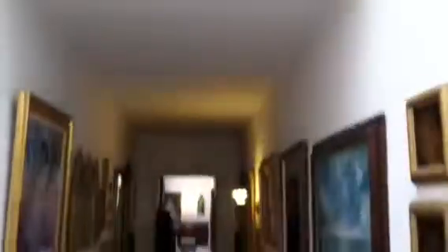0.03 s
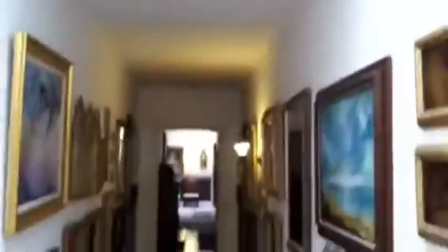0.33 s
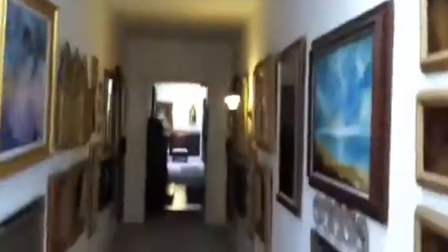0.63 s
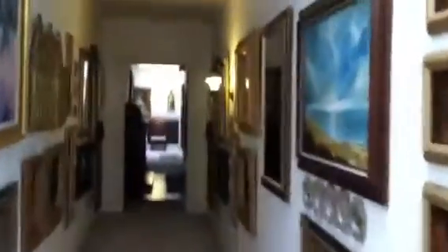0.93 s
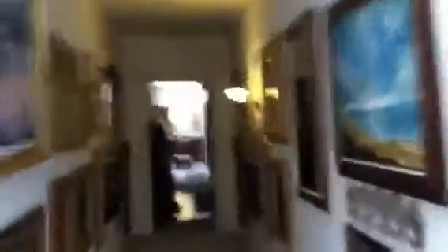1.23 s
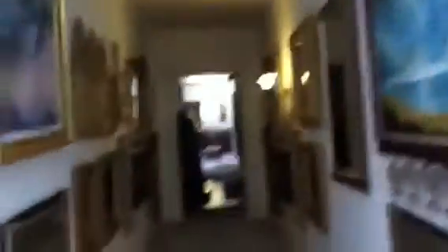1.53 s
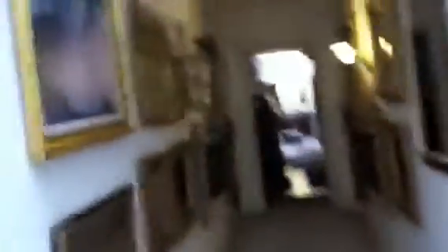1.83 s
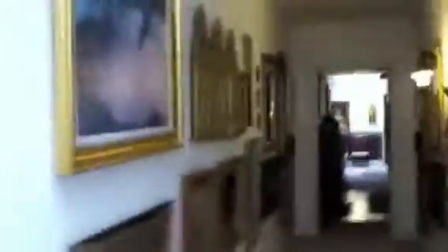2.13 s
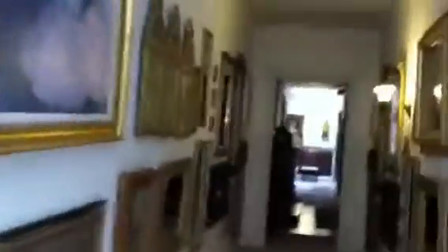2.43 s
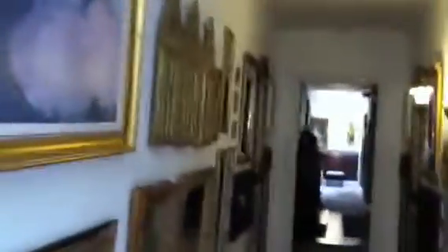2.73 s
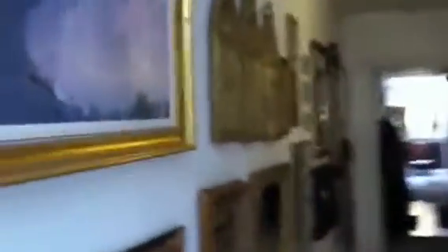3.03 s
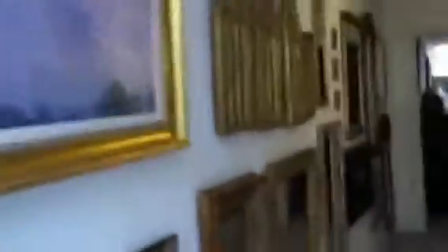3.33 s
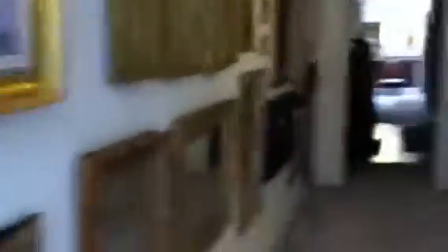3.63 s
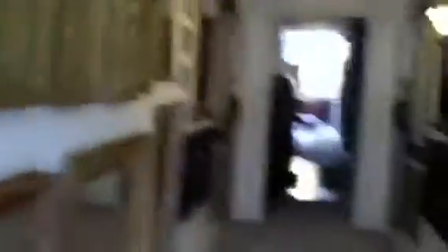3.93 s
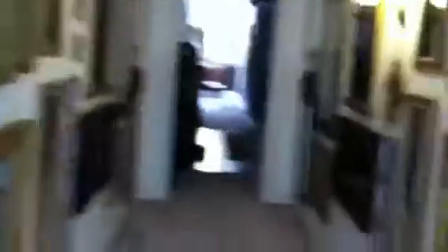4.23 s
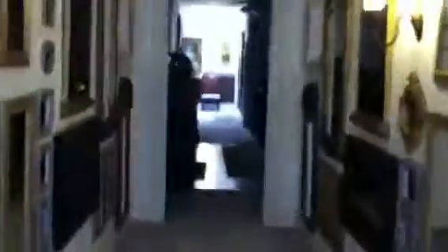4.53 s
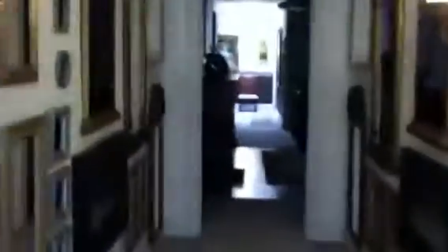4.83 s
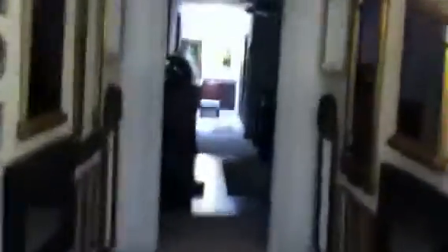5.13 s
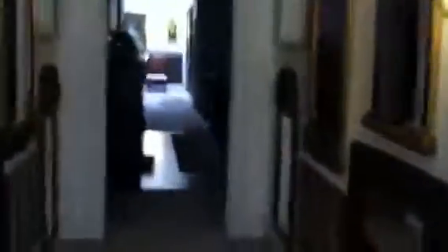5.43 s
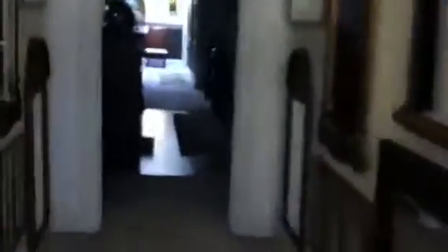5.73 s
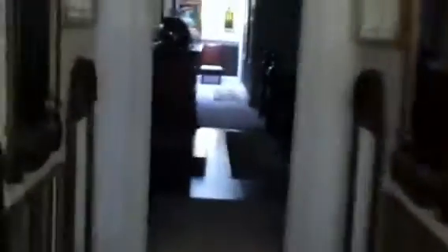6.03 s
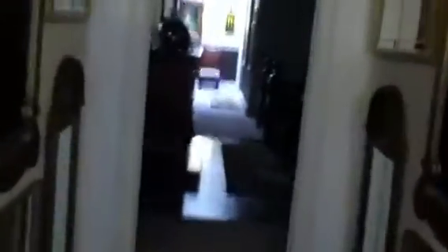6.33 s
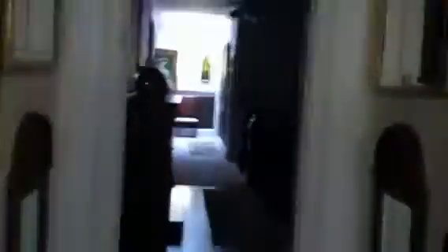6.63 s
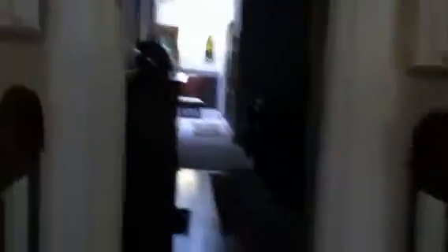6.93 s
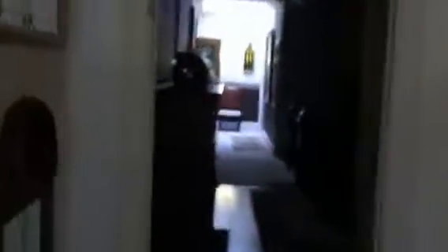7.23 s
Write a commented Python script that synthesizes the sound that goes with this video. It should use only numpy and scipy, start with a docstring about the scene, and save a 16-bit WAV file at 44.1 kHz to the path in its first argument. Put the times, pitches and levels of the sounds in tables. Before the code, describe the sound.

A quiet indoor hallway, heard from a small hand-held camera being carried slowly. For the first second there is only faint room tone, hiss and a weak low drone. From about 1.2 seconds fingers bump and rub softly on the plastic case, and clothing begins to rustle faintly with each step. At 1.8 seconds comes a cluster of firmer bumps, then the shell creaks in short, sharp, dry clicks right at the microphone, thickest around 2.1 seconds. More clicks fall at 2.5, from 2.8 to 3.3, and near 3.8 seconds, with brief rubs and hissy finger swipes between them. A tiny skin squeak comes at 4.1 seconds. Then it grows quieter and the drone fades. Light bumps near 5.5 seconds lead to one last sharp click at 5.7. Faint rubbing, rustle and a few soft taps continue until about 7.3 seconds.

```python
"""Creaking camera in a quiet hallway

A small hand-held camera is carried slowly over carpet. Its plastic shell creaks under the grip:
single slips of the seam ring the case right at the microphone, short and dry. Between them
fingers bump, rub, swipe and squeak on the case, and cloth rustles with the steps.
Behind it all lie a faint room tone, hiss and a low drone."""
import sys
import numpy as np
from scipy import signal
from scipy.fft import rfft, irfft, next_fast_len
from scipy.io import wavfile

SR = 44100
rng = np.random.default_rng(int(sys.argv[2]) if len(sys.argv) > 2 else 0)


def generate_wav(sig):
    """Save sig (samples, or channels by samples) to the path in sys.argv[1] as 16-bit PCM at SR."""
    pcm = np.round(np.clip(np.atleast_2d(sig).T, -1, 1) * 32767).astype(np.int16)
    wavfile.write(sys.argv[1], SR, pcm)


N = 321489
HIT_SAMPLES, LEAD_SAMPLES = 2048, 256

# Seam slips: start_s, strength_db, tilt_db_per_octave, panel_semitones, panel_db, hollow_db
SEAM_SLIPS = [(1.9188, 6, -.3, 0, 0, -2), (2.0382, 3, 0, -3.5, 0.5, 4.5), (2.082, 0, 0.4, 1, 0, -4),
              (2.0874, -0.5, -1.8, -0.8, 1.5, -2), (2.0971, -2.5, 0.5, -0.5, 3, -0.5),
              (2.1079, -1.7, -.4, 0.5, 0.5, -1), (2.1822, 1.5, -0.5, -1.5, 2.5, 3.5),
              (2.1895, -1.5, -1.5, -1.5, -1, 0), (2.4868, 1, 0, -.5, 2.5, 1.5),
              (2.8456, 3.5, .2, -1.5, -3, 10.5), (2.8574, 0.5, -2, 0.5, -4, 4),
              (3.0166, 1.5, -0.45, -0.1, -0.5, 1.5), (3.1401, 2.5, -0.44, 1, -1.5, -0.5),
              (3.1566, -1, -.6, 1, 0.5, 0.5), (3.2316, 1, -0.1, 2, 1, 1), (3.2627, 1, -0.5, 2, -0.5, -0.5),
              (3.292, 0, -0.3, 2, -0.5, -3), (3.773, 0, 0, .5, 1, 1), (3.79, -7, .8, 1, 2, 0),
              (3.812, -8.5, 2.05, 0, 2, 2), (3.9223, -8.5, 2.4, 1, 3, 2),
              (5.6544, 2.5, -.2, -0.5, -.5, 2.5)]
# Hard contact spectrum: freq_hz, gain_db
HARD_CONTACT = [(100, -6), (230, -4), (450, -1.5), (1000, 1.3), (2000, -2.5), (4800, -0.13), (11000, -.5)]


def seam_slips():
    """The seam lets go in clean, hard snaps, springing back after each."""
    return shell_hits(SEAM_SLIPS, HARD_CONTACT, crunch=0.27, crunch_s=0.0014, damping=1.02, rebound=0.26)


# Firm finger bumps: start_s, strength_db, tilt_db_per_octave, panel_db
FINGER_BUMPS = [(1.222, -29, 0, 1), (1.258, -31.5, -3.5, 0.5), (1.3438, -22, -1, 2), (1.366, -25, -1, 1),
                (1.395, -23, -0.5, -7), (1.485, -18, 2.3, -3), (1.5173, -10, -1, -2.5),
                (1.5601, -19, -3.5, 1.5), (1.801, -16, -1, -1.5), (1.8098, -6, 0, 3),
                (1.8168, -6, 0.5, 0.5), (1.826, -18, 1, -5.5), (1.8395, -5.5, 3.5, 2.5),
                (1.8465, 0.5, 1, -8), (1.8505, 2, 1, -2), (1.8545, -6, -1, 0), (1.872, -23, -1.5, -1),
                (1.9684, -25, .8, -3), (2.0328, -3, 1.5, -3), (2.503, -20.5, -2.5, 2.5),
                (2.555, -21, -0.5, 1.5), (2.69, -8, -1, -9), (2.695, -10, -3, -8), (2.826, -25, -3, 0),
                (2.894, -14, -0.5, 0.5), (3.44, -23, -0.5, -6), (3.632, -29, -6.5, 0.5),
                (3.69, -12.5, -1.5, 3), (3.702, -17, 1, 2), (4.101, -20.5, -1.5, 0), (4.157, -32, -2, 1),
                (4.487, -27, 1, -6), (5.439, -19, -.7, -3), (5.482, -20.5, -0.5, -8.5),
                (5.592, -30.5, -2, 1), (6.167, -25, -2, 0), (7.067, -31, -.5, 0.5)]
# Soft contact spectrum: freq_hz, gain_db
SOFT_CONTACT = [(230, 6.5), (550, -.5), (1000, 0.5), (2000, -11), (4800, -27)]
WALK_START_S = 1.2


def finger_bumps(load_semitones, spread_semitones):
    """A finger lands with a crunch; its weight lowers the panel's pitch on average."""
    touches = list(FINGER_BUMPS) + faint_taps(taps_per_s=2, strength_db=-39, spread_db=1)
    shifts = load_semitones + spread_semitones * rng.standard_normal(len(touches))
    hits = [(start_s, strength_db, tilt, shift, panel_db, 0)
            for (start_s, strength_db, tilt, panel_db), shift in zip(touches, shifts)]
    return shell_hits(hits, SOFT_CONTACT, crunch=1.0, crunch_s=0.0033, damping=1.1, rebound=0)


def faint_taps(taps_per_s, strength_db, spread_db, tilt_db_per_octave=-1.5, panel_db=-1, count=40):
    """Light touches at random moments of the walk, as FINGER_BUMPS rows."""
    starts_s = WALK_START_S + np.cumsum(rng.exponential(1 / taps_per_s, count))
    strengths_db = strength_db + spread_db * rng.standard_normal(count)
    return [(s, db, tilt_db_per_octave, panel_db) for s, db in zip(starts_s, strengths_db) if s < N / SR]


def shell_hits(hits, colour, crunch, crunch_s, damping, rebound):
    """Each contact is one jolt and a dying crunch of micro-slips, heard through the case."""
    t = np.arange(HIT_SAMPLES) / SR
    fade = signal.windows.tukey(HIT_SAMPLES, 1 / 8)
    case_node = signal.iirnotch(2913, Q=16.5, fs=SR)   # the microphone sits on a node at this pitch
    jolt = t == 0
    out = np.zeros(N + HIT_SAMPLES)
    for start_s, strength_db, tilt, panel_semitones, panel_db, hollow_db in hits:
        grit = rng.standard_normal(HIT_SAMPLES) * np.exp(-t / crunch_s)
        force = (jolt + crunch * grit / np.linalg.norm(grit)) / np.hypot(1, crunch)
        # A brief tighter grip stiffens the walls and moves the node off the microphone.
        squeezed = 3.75 < start_s < 3.95
        wall_semitones = 1.34 if squeezed else -0.26
        modes = shell_ring(panel_semitones, wall_semitones, damping, panel_db, hollow_db)
        ring = signal.fftconvolve(spring_back(force, rebound), modes)[:HIT_SAMPLES]
        if not squeezed:
            ring = signal.lfilter(*case_node, ring)
        start = round(start_s * SR) - LEAD_SAMPLES
        out[start:start + HIT_SAMPLES] += fade * coloured(ring, contact_colour(colour, strength_db, tilt))
    return out[:N]


# Shell modes: pitch_hz, level_db, t60_s, polarity
SHELL_MODES = [(419, -27.5, 0.026, 1), (557, -17, 0.017, 1), (677, -16.0, 0.016, -1),
               (931, -22.5, 0.019, 1), (1220, -34.5, 0.008, 1), (1509, -30, 0.0087, 1),
               (2052, -12, 0.0069, -1), (3144, -20, 0.0046, 1), (4416, -9, 0.0035, -1),
               (6320, -11.5, 0.0017, 1), (7994, -30, 0.0032, -1), (11300, -32.5, 0.0019, 1),
               (13852, -36.5, 0.0022, 1)]


def shell_ring(panel_semitones, wall_semitones, damping, panel_db, hollow_db):
    """The case rings: low panel modes retuned and damped by the grip, one hollow mode, stiff walls."""
    pitch_hz, level_db, t60_s, polarity = np.transpose(SHELL_MODES)
    panel, wall = pitch_hz < 800, pitch_hz > 1200
    hollow = ~panel & ~wall
    t = np.maximum(np.arange(HIT_SAMPLES) - LEAD_SAMPLES, 0)[:, None] / SR
    tuned_hz = pitch_hz * 2 ** ((panel * panel_semitones + wall * wall_semitones) / 12)
    gain = np.sign(polarity) * from_db(level_db + panel * panel_db + hollow * hollow_db)
    decay = np.exp(-np.log(1000) * t / t60_s * np.where(panel, damping, 1))
    return (gain * decay * np.sin(2 * np.pi * tuned_hz * t)).sum(axis=1)


def spring_back(force, share, delay_s=0.002578, smear_s=0.00015):
    """A duller jolt the other way follows a slip."""
    pole = np.exp(-1 / (smear_s * SR))
    smeared = signal.lfilter([1 - pole], [1, -pole], force)
    n = np.arange(len(force))
    return force - share * np.interp(n - delay_s * SR, n, smeared, left=0)


def contact_colour(colour, strength_db, tilt_db_per_octave, pivot_hz=1000):
    """A harder contact tilts the spectrum toward the treble."""
    hz, db = np.transpose(colour)
    return np.column_stack([hz, db + strength_db + tilt_db_per_octave * np.log2(hz / pivot_hz)])


# Shifts of the grip: peak_s, level_db, length_s
GRIP_SHIFTS = [(1.323, -55.5, 0.038), (1.412, -61, 0.083), (1.53, -61, 0.085), (1.846, -44, 0.081),
               (1.912, -51, 0.026), (2.036, -56, 0.077), (2.15, -49.5, 0.052), (2.207, -48.5, 0.075),
               (2.374, -47.5, 0.066), (2.483, -52.5, 0.035), (2.602, -49, 0.03), (2.676, -50, .08),
               (2.887, -48.5, .06), (2.947, -55.5, 0.03), (3.001, -50.5, 0.059), (3.39, -49.5, 0.057),
               (3.477, -58.5, .07), (3.607, -57, .06), (3.72, -52.5, .06), (4.072, -56, .1),
               (4.49, -62, 0.076), (4.674, -60, 0.077), (4.836, -62.5, 0.13), (5.519, -60, 0.13),
               (6.195, -60, 0.12), (6.544, -61, 0.073), (6.794, -61, 0.11), (7.1, -60, 0.067)]


def grip_shifts(edge_db, rise_share):
    """Friction gain as the grip shifts: each rub gathers, peaks and eases off."""
    gain = np.zeros(N)
    for peak_s, level_db, length_s in GRIP_SHIFTS:
        offset = (np.arange(N) / SR - peak_s) / length_s
        side_share = np.where(offset < 0, rise_share, 1 - rise_share)
        distance = np.minimum(np.abs(offset) / side_share, 10)
        gain += from_db(level_db - edge_db * distance ** 1.48)
    return gain


# Steady hand friction: time_s, level_db
GRIP_LEVEL = [(0, -75), (1.15, -88), (1.3, -67.5), (2, -63.5), (3.3, -64), (4.3, -68), (7.29, -67)]
# Skin on plastic: freq_hz, density_db
RUB_SPECTRUM = [(60, -26.5), (130, -6.5), (300, 2), (550, 2), (900, -1), (1250, -4.5), (1900, -9),
                (2900, -25), (5000, -28.5), (12000, -49)]


def rubbing(rub_gain, grains_per_s, grain_db, patchy_db):
    """Skin drags over plastic in tiny uneven slips; the rubs ride on the steady grip."""
    sizes = from_db(grain_db * np.minimum(rng.exponential(1, N), 4))
    signs = rng.choice([-1, 1], N)
    grains = unit_rms(sizes * signs * (rng.random(N) < grains_per_s / SR))
    friction = (grains + rng.standard_normal(N)) * from_db(patchy_db * drift(rate_hz=70))
    grip_db, = curves(GRIP_LEVEL)
    return np.hypot(from_db(grip_db), rub_gain) * unit_rms(coloured(friction, RUB_SPECTRUM))


# Fingertip sweeps: start_s, end_s, end_level_db
FINGER_SWIPES = [(1.806, 1.853, -55.5), (2.305, 2.407, -60.5), (2.784, 2.812, -65), (3.338, 3.406, -53)]
# Dry skin hiss: freq_hz, density_db
SWIPE_SPECTRUM = [(3000, -17), (4400, -4), (5300, 1.5), (6500, -6), (8500, -13), (11500, -21), (14000, -37)]


def swipes(swell_db, edge_s):
    """Dry skin hisses louder as it gathers speed, then lifts off."""
    t = np.arange(N) / SR
    gain = np.zeros(N)
    for start_s, end_s, end_level_db in FINGER_SWIPES:
        progress = np.clip((t - start_s) / (end_s - start_s), 0, 1)
        touching = np.clip(np.minimum(t - start_s, end_s - t) / edge_s + 0.5, 0, 1)
        gain += touching * from_db(end_level_db - swell_db * (1 - progress))
    return gain * noise(SWIPE_SPECTRUM)


# Squeak harmonics, fundamental first: level_db
SQUEAK_HARMONICS = [-46.5, -67, -54, -64]


def squeak(peak_s, length_s, pitch_hz, sag_hz_per_s):
    """Skin sticks and slips evenly for a few cycles, sagging in pitch."""
    t = np.arange(N) / SR - peak_s
    envelope = np.cos(np.pi * np.clip(t / length_s, -0.5, 0.5)) ** 2
    phase = 2 * np.pi * (pitch_hz * t - sag_hz_per_s * t ** 2 / 2)
    return envelope * sum(from_db(db) * np.sin(k * phase) for k, db in enumerate(SQUEAK_HARMONICS, 1))


# Mean rustle: time_s, level_db
CLOTH_LEVEL = [(0, -84.5), (1.2, -75), (3.4, -75.5), (4.5, -71.5), (5.3, -73), (6, -70.5), (7.29, -72)]
# Sliding cloth: freq_hz, density_db
CLOTH_SPECTRUM = [(400, -14.5), (1500, 5.5), (2800, 4), (3700, -2), (5000, -3), (7000, -6), (9500, -10.5),
                  (12000, -20.5), (15000, -28.5)]


def cloth_rustle(rub_gain, sleeve_db, first_swish_s, step_s, swish_db, patchy_db):
    """Clothes slide with a soft hiss that swells at each step; the sleeve follows each rub."""
    t = np.arange(N) / SR
    walking = np.clip(t / WALK_START_S - 1, 0, 1)
    stride = walking * np.cos(2 * np.pi * (t - first_swish_s) / step_s)
    mean_db, = curves(CLOTH_LEVEL)
    gain = np.hypot(from_db(mean_db + swish_db * stride), from_db(sleeve_db) * rub_gain)
    hiss = noise(CLOTH_SPECTRUM) * from_db(patchy_db * drift(rate_hz=60))
    return gain * unit_rms(hiss)


# Room tone: time_s, murmur_db, air_db
ROOM_LEVELS = [(0, -67.5, -69), (1.2, -67, -67.5), (3.9, -68, -77.5), (4.3, -68, -87), (7.29, -69.5, -93)]
# Murmur and hiss: freq_hz, density_db
ROOM_SPECTRUM = [(15, -66), (25, -35.5), (59, -35.5), (78, -14.5), (123, -0.5), (217, 1), (394, -4.5),
                 (451, -22.5), (641, -20.5), (695, -19), (796, -17.5), (1290, -16.5), (2000, -19),
                 (12900, -30.5), (16000, -51)]
# Moving air: freq_hz, density_db
AIR_SPECTRUM = [(200, -25), (450, -1), (800, 0.5), (1300, -1), (1900, -20.5), (4000, -37.5)]


def room_tone():
    """Low murmur of the building with a little moving air and microphone hiss."""
    murmur_db, air_db = curves(ROOM_LEVELS)
    return from_db(murmur_db) * noise(ROOM_SPECTRUM) + from_db(air_db) * noise(AIR_SPECTRUM)


# Building drone: time_s, pitch_hz, level_db
BUILDING_DRONE = [(0, 140.5, -85), (0.7, 128, -74), (1.1, 121.9, -77.5), (2.7, 124.4, -74.5),
                  (3.05, 139, -71), (3.9, 141.1, -69), (4.4, 142.6, -73.5), (5.2, 143.8, -95.5),
                  (7.29, 144, -87)]


def drone():
    """One faint low tone somewhere in the building slides in pitch and level."""
    pitch_hz, level_db = curves(BUILDING_DRONE)
    return np.sqrt(2) * from_db(level_db) * np.sin(2 * np.pi * np.cumsum(pitch_hz) / SR)


def from_db(db):
    """Decibels to gain."""
    return 10 ** (np.asarray(db) / 20)


def unit_rms(x):
    """Scale to rms 1."""
    return x / np.sqrt(np.mean(x ** 2) + 1e-20)


def curves(rows):
    """One value per sample for each column after time_s."""
    time_s, *columns = np.transpose(rows)
    return [np.interp(np.arange(N) / SR, time_s, column) for column in columns]


def coloured(x, spectrum):
    """Filter by freq_hz, gain_db points joined on a log-frequency axis."""
    hz, db = np.transpose(spectrum)
    size = next_fast_len(len(x))
    bins_hz = np.maximum(np.fft.rfftfreq(size, 1 / SR), 1)
    gain = from_db(np.interp(np.log(bins_hz), np.log(hz), db))
    return irfft(rfft(x, size) * gain, size)[:len(x)]


def noise(spectrum):
    """Coloured noise, rms 1."""
    return unit_rms(coloured(rng.standard_normal(N), spectrum))


def drift(rate_hz):
    """Random wander through rate_hz Gaussian points a second."""
    knots = rng.standard_normal(4000)
    return np.interp(np.arange(N) / SR * rate_hz, np.arange(len(knots)), knots)


def scene():
    """Case sounds reach the microphone through the plastic, so they carry no room."""
    rub_gain = grip_shifts(edge_db=7.5, rise_share=0.57)
    hand = rubbing(rub_gain, grains_per_s=2500, grain_db=2.5, patchy_db=2.53)
    cloth = cloth_rustle(rub_gain, sleeve_db=-23.5, first_swish_s=1.35, step_s=0.65,
                         swish_db=2.5, patchy_db=1.34)
    fingertip = swipes(swell_db=15, edge_s=0.0069)
    fingertip += squeak(peak_s=4.108, length_s=0.036, pitch_hz=425, sag_hz_per_s=1300)
    background = room_tone() + drone()
    knocks = seam_slips() + finger_bumps(load_semitones=-0.66, spread_semitones=2.0)
    # The tiny microphone barely picks up the slow flexing of its case.
    bass_cut = signal.butter(3, 144, "high", fs=SR, output="sos")
    return (signal.sosfilt(bass_cut, knocks) + hand + fingertip + cloth + background)[None]


# Microphone response: freq_hz, gain_db
MIC_RESPONSE = [(100, -1.5), (160, -0.5), (2550, -0.5), (2880, -1.5), (3200, 0), (8000, -0.5), (9000, -2),
                (10000, -1), (14200, -6), (16000, -15)]


def record(dry):
    """The microphone rounds the tallest peaks and colours the sound; the top is cut steeply."""
    heard = coloured(np.tanh(dry[0]), MIC_RESPONSE)
    treble_cut = signal.ellip(10, 0.1, 80, 16500, fs=SR, output="sos")
    return signal.sosfilt(treble_cut, heard)[None]


dry = scene()
out = record(dry)
generate_wav(out)
```